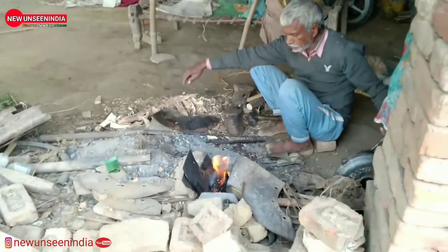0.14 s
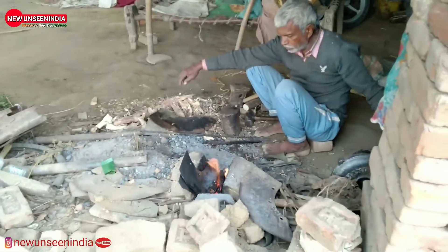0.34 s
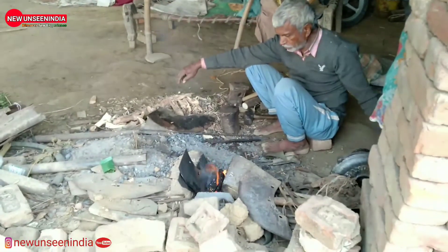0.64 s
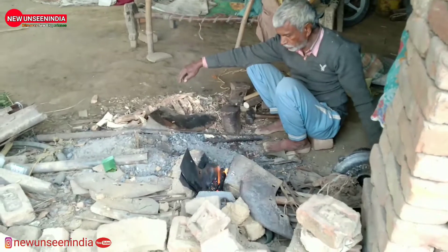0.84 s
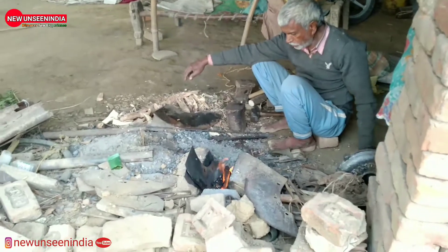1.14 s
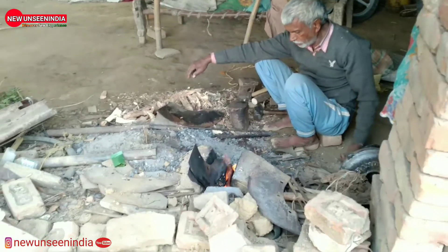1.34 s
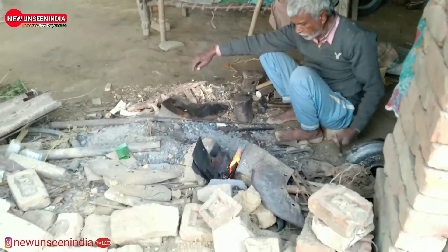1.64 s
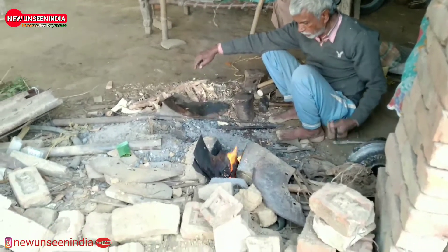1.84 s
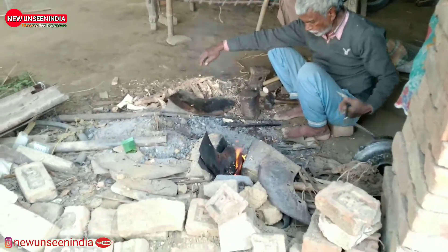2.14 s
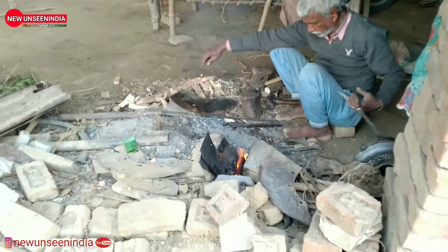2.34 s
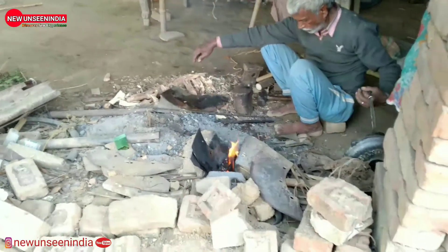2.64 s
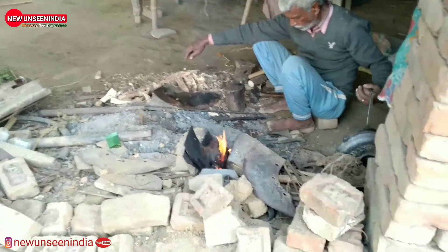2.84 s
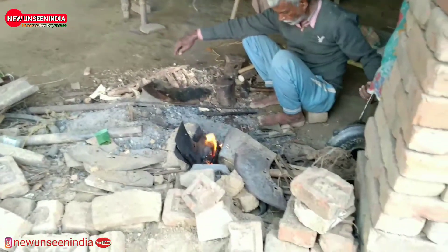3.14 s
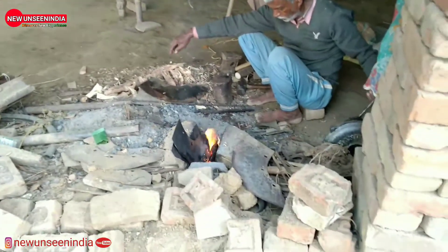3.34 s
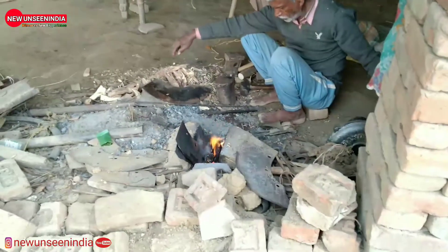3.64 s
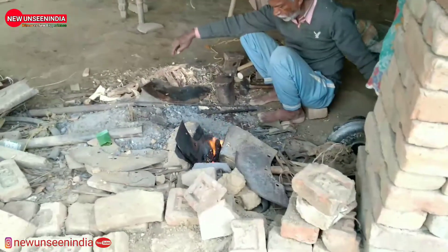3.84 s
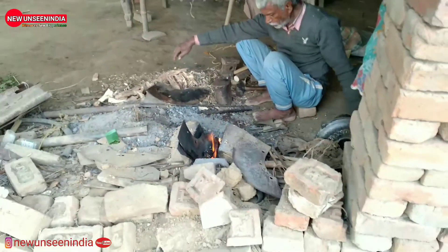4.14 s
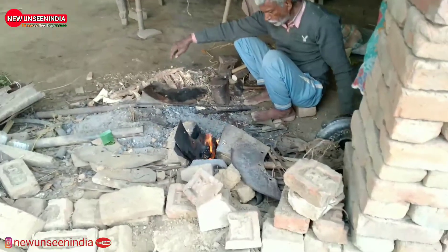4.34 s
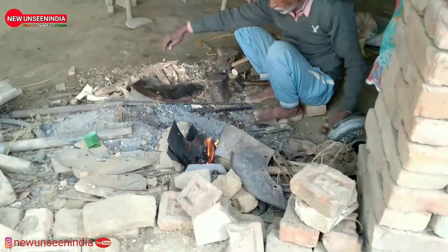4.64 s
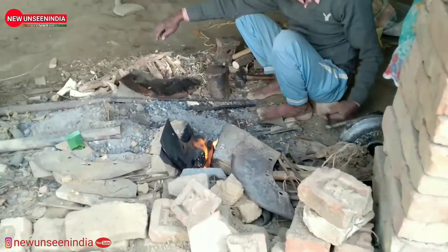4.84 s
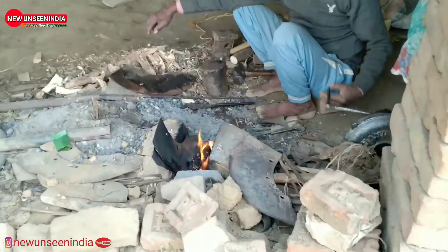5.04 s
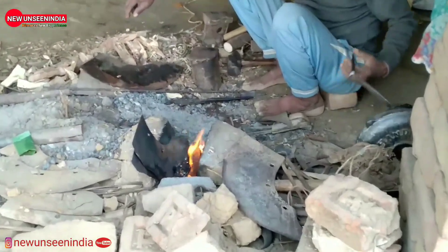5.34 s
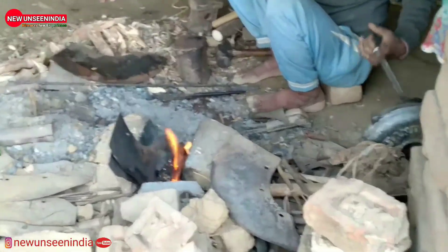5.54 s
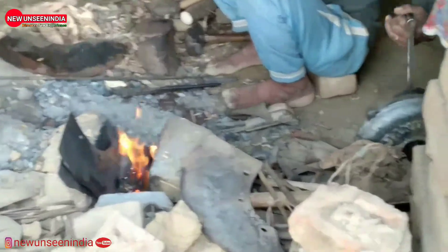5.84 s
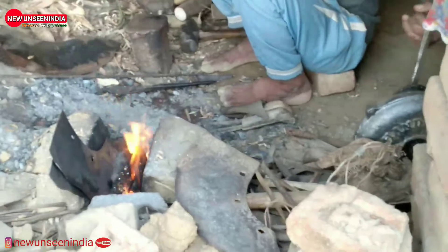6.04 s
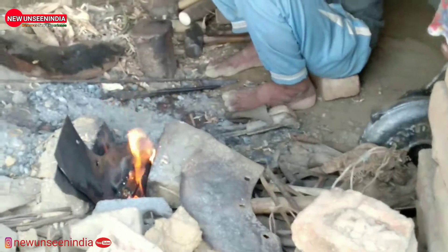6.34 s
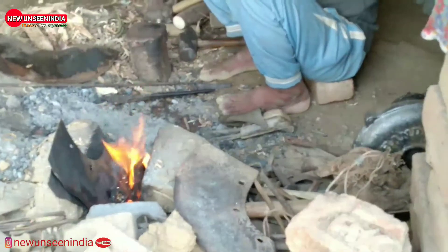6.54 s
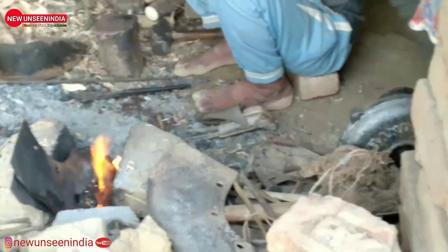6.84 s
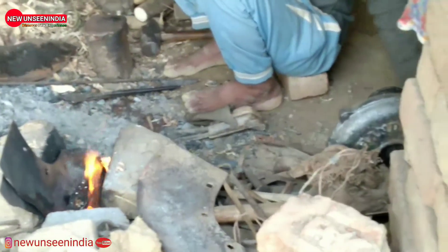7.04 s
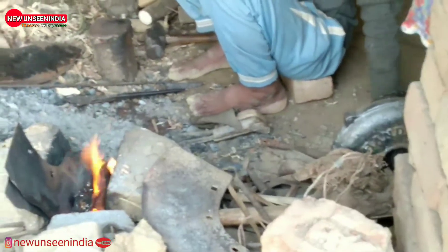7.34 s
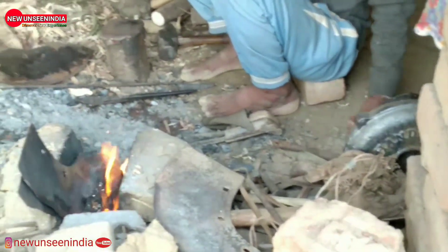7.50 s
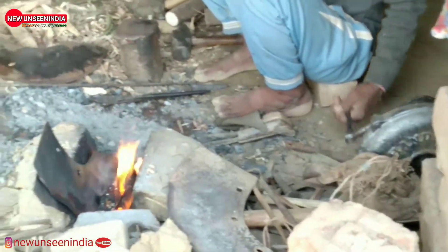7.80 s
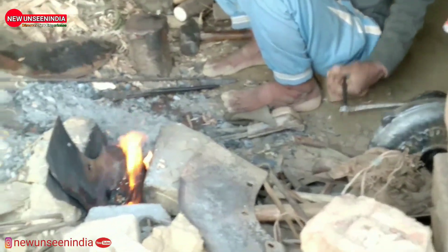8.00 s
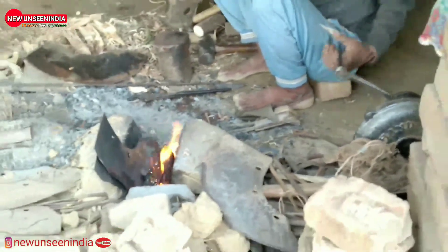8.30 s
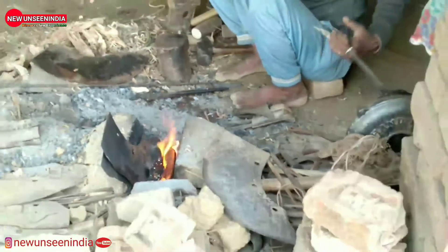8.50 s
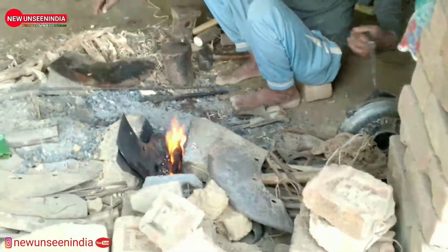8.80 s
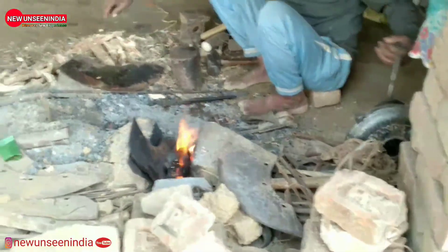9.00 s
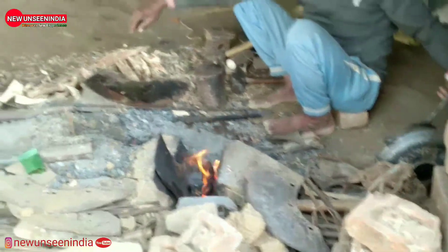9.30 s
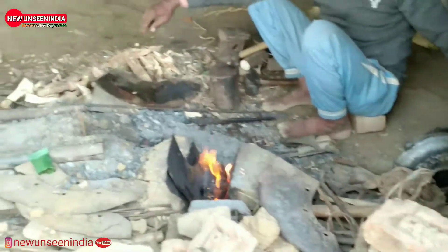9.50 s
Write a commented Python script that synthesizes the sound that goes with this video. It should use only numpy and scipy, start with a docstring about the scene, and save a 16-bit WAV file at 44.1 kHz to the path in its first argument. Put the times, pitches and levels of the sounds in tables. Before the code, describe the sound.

Dry metallic chuffing from a small hand-turned forge fan, about a dozen scrapes a second, surging and slowing over a faint low rumble.

```python
"""A hand-cranked rotary bellows blows into a small ground forge in an open yard, over a low rumble.
It quickens within 0.8 s; once a turn the fan scrapes the tin casing, catches again and puffs out air.
The turns crowd together and grow loud on each push of the crank, then slow down between pushes.
Near 2.8 s, 6 s and 8.9 s the fan is slow and its rim sings briefly; the last push builds to the end.
Shaped noise passes through resonators for the blower; flame and yard are low-frequency filtered noise."""
import sys
import numpy as np
from scipy import signal
from scipy.fft import rfft, irfft, next_fast_len
from scipy.io import wavfile
from scipy.ndimage import uniform_filter1d

SR = 44100
rng = np.random.default_rng(int(sys.argv[2]) if len(sys.argv) > 2 else 0)


def put_to_file(sound):
    """Save the sound as 16-bit audio at rate SR, in the file named by the first command-line argument."""
    columns = np.atleast_2d(sound).T  # one column per channel
    safe = np.clip(columns, -1, 1)
    whole_steps = np.round(safe * 32767)
    wavfile.write(sys.argv[1], SR, whole_steps.astype(np.int16))


N = 426006

# Tone balance of the blower's low range, softest near 660 Hz: f/Hz, level/dB
LOW_BALANCE = [(300, 2), (335, -2), (400, 1.5), (480, 0), (570, -1.5), (660, -5.5), (740, 1), (900, 2),
               (1100, 1)]
BLOWER_DB = -25.5   # rms level without the singing rim


def blower():
    """Superposition: friction, impacts and air flow add up to one sound of the blower."""
    tin = rms_one(casing(reflected(friction(patchy_db=2.5), echo_db=-4.5)))
    rub = rubbing()
    inside = scrape(tin, rub) + from_db(5.5) * sizzle(tin, rub)
    inside = inside + from_db(0.86) * rattle(tin) + from_db(-1.0) * puff(tin)
    inside = inside + flow() + knocks()
    outside = ports(filtered(inside, from_db(per_bin(LOW_BALANCE))))
    return from_db(BLOWER_DB) * rms_one(outside) + sings()


# Each LAW: level at cruising speed/dB, rise per doubling of speed/dB,
# rise per doubling a second of push/(dB s), share of the contact/1, share of the draught/1
SCRAPE_LAW = (3, 6.5, -0.65, 1.08, 0)
# Friction in one turn: part of the turn/1, level/dB, share of the second rub/1, gain on a slow turn/dB
SCRAPE_TURN = [(.04, 2.5, 0, -3.5), (.11, 5, 0.14, -3.5), (.23, 4.5, 0.06, -9.5), (.32, 3, 0.58, -12.5),
               (.43, 2.2, 0.88, -5.5), (.56, 0.9, 0.58, -14.5), (.72, -4.5, 1, -7.5), (.9, -6, 0.74, -9),
               (.985, -2, 0.74, -9)]


def rubbing():
    """Dry friction: the force of contact repeats with each turn; drags add to it in power."""
    contact = np.hypot(each_turn(SCRAPE_TURN, SCRAPE_LAW, bright=True), drags())
    return contact * gritty(grit_db=1.04, grit_rate=93)


def scrape(tin, rub):
    """Friction-excited vibration: the rub modulates two upper bands of the tin sound."""
    lower = evened(tin, 2168, 5004) * gritty(grit_db=0.24, grit_rate=27)
    upper = evened(tin, 4910, 9900)
    return rub * (lower + upper)


# Gain of the treble above about 10 kHz: t/s, level/dB
TREBLE = [(0, 2.5), (1, 1.5), (2.5, 1), (4.2, -1.5), (5.3, 0), (6.3, 1), (7.5, -1.2), (8.298, 1.5),
          (9.099, -0.5), (9.66, 2.5)]


def sizzle(tin, rub):
    """Nonlinear brightening: the treble grows faster than the force of contact."""
    harder = rms_one(rub ** 1.15) * gritty(grit_db=1.5, grit_rate=29)
    return harder * evened(tin, 9910, 20300) * from_db(over_time(*np.transpose(TREBLE)))


RATTLE_LAW = (2.6, 16.4, 0.037, 0.73, 0.16)
# Shaking of the casing in one turn: part of the turn/1, level/dB, share of the second rub/1,
# gain on a slow turn/dB
RATTLE_TURN = [(.045, 5.5, 0, 7.5), (.17, 4.5, 0.6, 4.5), (.3, 4, 0, 1.5), (.43, 5.5, 0, -1.5),
               (.55, 1, 0, -3), (.71, -4, 0, -9), (.83, -2, 0, 1), (.985, 1.5, 0.65, -4.5)]
# Hollowness, the low band of the rattle against the upper ones: t/s, level/dB
HOLLOWNESS = [(0, 0), (1.3, -6.5), (2.805, 2.5), (4.1, -0.5), (5.298, 4), (6.799, 1), (8.3, 2.5),
              (9.2, 1.5), (9.66, -2)]


def rattle(tin):
    """Independent modulation: each of three lower bands of the tin sound is shaken in its own way."""
    hollow = from_db(over_time(*np.transpose(HOLLOWNESS)) / 2)   # half up, half down
    shake = each_turn(RATTLE_TURN, RATTLE_LAW) * gritty(grit_db=1.5, grit_rate=210)
    low, middle, high = (gritty(grit_db=1.83, grit_rate=33) for _ in range(3))
    low_band = evened(tin, 590, 951) * low
    upper_bands = evened(tin, 975, 1365) * middle + evened(tin, 1382, 2133) * high
    return shake * (low_band * hollow + upper_bands / hollow)


PUFF_LAW = (2.1, 13, 2.74, 1.03, 1.08)
# Air pushed out in one turn: part of the turn/1, level/dB, share of the second rub/1,
# gain on a slow turn/dB
PUFF_TURN = [(.05, 6, 0, 10.5), (.28, 6.5, 0.26, -1.5), (.42, 7, 0.1, -1), (.65, -9, 0.1, 4),
             (.85, 5.5, 0, -6.5)]


def puff(tin):
    """Pulsating flow: each turn pushes out air, heard in the lowest band of the tin sound."""
    pulse = each_turn(PUFF_TURN, PUFF_LAW) * gritty(grit_db=3.0, grit_rate=95)
    return pulse * evened(tin, 301, 665)


FLOW_LAW = (-13, 7, -1, 1, 0.72)
# Spectral density of air streaming through the pipe and humming on its modes: f/Hz, level/dB
FLOW_SPECTRUM = [(200, -35), (340, -10), (410, -6.5), (520, -6), (690, -10.5), (790, -1.5), (850, -3),
                 (900, -0.5), (970, -9), (1130, -0.5), (1350, -6), (2200, -17)]


def flow():
    """Turbulence noise: the stream is continuous and its level follows the speed of the fan."""
    stream = filtered(rng.standard_normal((2, N)), from_db(per_bin(FLOW_SPECTRUM)))
    return from_db(driven_db(FLOW_LAW, np.arange(N) / SR)) * rms_one(stream)


# Moments when the fan catches the casing hard: t/s, level/dB
HARD_CATCHES = [(0.184, 0), (0.376, -1), (0.622, 10), (0.999, 3), (1.886, 7), (2.718, 6.5), (3.018, 1.5),
                (3.171, 0.5), (3.407, 3.5), (3.592, 4), (3.75, 12.5), (3.825, 10), (3.9, 12.5), (4.432, 10),
                (4.517, 12), (4.978, 13.5), (6.162, 3), (6.546, 12.5), (6.706, 4), (6.784, 11), (6.859, 11),
                (6.94, 10.5), (7.967, 6), (8.36, 11), (8.833, 7), (9.378, 7.5), (9.466, 9), (9.551, 8)]
KNOCK_ATTACK_S, KNOCK_DECAY_S = 0.0019, 0.01
# Spectral density of a knock before it enters the casing: f/Hz, level/dB
KNOCK_SPECTRUM = [(150, -25), (400, -6), (1000, 8.5), (2000, 9), (5000, 7), (14000, 8)]


def knocks():
    """Impact excitation: short noise bursts, as shared and diffuse sound, leave the casing ringing."""
    t, burst = np.arange(N) / SR, ticks()
    for s, db in HARD_CATCHES:
        age = t[:4000]
        pulse = np.exp(-age / KNOCK_DECAY_S) * np.minimum(age / KNOCK_ATTACK_S, 1)
        burst[int(s * SR):][:len(age)] += from_db(db) * pulse
    noise = burst * rng.standard_normal((2, N))
    return casing(filtered(noise, from_db(per_bin(KNOCK_SPECTRUM))))


# TICK_DB is the faintest tick; the excess above it is exponential, at most three spreads
TICKS_PER_S, TICK_DB, TICK_SPREAD_DB, TICK_DECAY_S = 21, -14, 5, 0.0014


def ticks():
    """Poisson process: loose parts tick at random all the time and each tick decays; gain per sample."""
    sizes = from_db(TICK_DB + TICK_SPREAD_DB * np.minimum(rng.exponential(1, N), 3))
    born = rng.random(N) < TICKS_PER_S / SR
    decay = np.exp(-1 / (TICK_DECAY_S * SR))
    return signal.lfilter([1], [1, -decay], sizes * born + 1e-18)


# Moments when the fan drags on the casing in mid-turn: t/s, length/s, level/dB
MID_TURN_DRAGS = [(1.245, 0.03, -7), (1.41, 0.025, 6), (2.152, 0.02, 2), (3.083, 0.03, -11),
                  (3.347, 0.028, -23), (4.463, 0.02, 4), (5.608, 0.03, 5), (5.666, 0.02, 3),
                  (5.7, 0.047, 3), (5.79, 0.025, -1), (5.822, 0.024, 3), (6.112, 0.025, -8),
                  (6.63, 0.015, 8), (7.13, 0.028, 3), (7.212, 0.043, 4.5), (8.769, 0.044, 5),
                  (9.11, 0.02, -4), (9.22, 0.015, -6)]


def drags():
    """Intermittent contact: a wobble of the axle makes the rub swell and fade; gain per sample."""
    t = np.arange(N) / SR
    return sum(from_db(db) * np.exp(-(2 * (t - s) / length) ** 2) for s, length, db in MID_TURN_DRAGS)


# Brief tones of the fan's rim on slow turns: t/s, length/s, f/Hz, level/dB
RIM_TONES = [(2.784, 0.05, 3990, -37), (2.937, 0.045, 3980, -43), (5.987, 0.074, 3840, -50),
             (8.882, 0.052, 4000, -40), (9.005, 0.052, 3960, -57)]


def sings():
    """Friction-excited resonance: a light touch makes one narrow mode of the rim swell and fade."""
    t, out = np.arange(N) / SR, np.zeros(N)
    waver = np.cumsum(drift(146)) * 30 / SR   # phase in cycles; the pitch strays by 30 Hz rms
    for s, length, hz, db in RIM_TONES:
        swell = np.exp(-(2 * (t - s) / length) ** 2)
        out += np.sqrt(2) * from_db(db) * swell * np.sin(2 * np.pi * (hz * t + waver))
    return out * gritty(grit_db=2.0, grit_rate=51)


def friction(patchy_db, count=20):
    """Random surface roughness: two flat noises change colour as the point of contact wanders."""
    white = rng.standard_normal((2, 2, N))   # neighbouring bands get unrelated noise
    edges = np.linspace(np.sqrt(200), np.sqrt(17500), count + 1) ** 2
    total = 0
    for k, (low, high) in enumerate(zip(edges, edges[1:])):
        total = total + band(white[k % 2], low, high) * rms_one(from_db(patchy_db * drift(18.0)))
    return total


# Reflection of the small tin walls, strongest near 2.2 kHz: f/Hz, level/dB
WALL_REFLECTION = [(900, -4), (2200, 0.5), (10000, -3.5)]


def reflected(x, echo_db, count=3):
    """Comb filtering: every turn touches another spot, so its echoes have their own short delays."""
    turn = np.searchsorted(turn_starts() * SR, np.arange(N))
    lags = (rng.uniform(.0006, .007, (turn[-1] + 1, count)) * SR).astype(int)
    signs = rng.choice([-1, 1], lags.shape)
    echoes = sum(signs[turn, k] * x[:, np.arange(N) - lags[turn, k]] for k in range(count))
    return x + from_db(echo_db) * filtered(echoes, from_db(per_bin(WALL_REFLECTION)))


# Peaks and dips of the blower's tone colour: f/Hz, bandwidth/Hz, lift/dB
PEAKS_AND_DIPS = [(389, 36, 8.7), (438, 67, 9.1), (773, 33, 12.5), (900, 42, 17.9), (1062, 60, 9.2),
                  (1183, 62, 12.4), (1462, 68, 9.2), (1770, 70, 6.5), (1925, 67, 2.8), (2465, 38, 5.8),
                  (2650, 38, 6), (2795, 55, 5.8), (2989, 49, 4.4), (3202, 46, 5), (3385, 45, 3),
                  (3538, 35, 4.2), (3723, 50, 5.6), (3845, 85, 5.8), (3998, 136, 11.2), (4112, 40, 8),
                  (4249, 84, 8.8), (4425, 62, 8.7), (4590, 150, -5.5), (4753, 65, 6.2), (5290, 89, 5.1),
                  (5580, 50, 3.5), (5865, 110, 7.5), (6340, 60, 3), (6690, 55, 3.6), (7437, 179, 2.2),
                  (7909, 116, 1.7), (8900, 200, 2.2), (9705, 89, 3.0), (11100, 200, 2), (14381, 89, 4.8)]
# Broad spectral envelope of the blower: f/Hz, level/dB
BLOWER_ENVELOPE = [(300, -16.1), (600, -15.0), (700, -17.6), (1100, -12.3), (1350, -12.8), (2200, -11.2),
                   (2550, -10.9), (3000, -8.3), (3600, -10.9), (4500, -12.8), (5000, -10.2), (5400, -6.3),
                   (6200, -5.2), (6800, -1.9), (8000, 0.0), (9000, -4.5), (10200, -9.9), (12000, -4.1),
                   (14300, -11.9), (15300, -9.9)]


def casing(x):
    """Resonance: two-pole filters in series give all sounds of the casing the same peaks and dips."""
    for hz, width, lift_db in PEAKS_AND_DIPS:
        r = np.exp(-np.pi * width / SR)
        poles = [1, -2 * r * np.cos(2 * np.pi * hz / SR), r * r]
        peak = signal.lfilter([1, 0, -1], poles, x) * (1 - r * r) / 2
        x = x + (from_db(lift_db) - 1) * peak
    return filtered(x, from_db(per_bin(BLOWER_ENVELOPE)))


# Left minus right level: f/Hz, level/dB
LEFT_OVER_RIGHT = [(250, 3.5), (420, 1.5), (650, 0), (850, 4.5), (1150, 8), (1450, 0), (1900, -1),
                   (2300, -2), (3900, 0), (4800, -2.5), (6200, -11.5), (8000, -9), (9500, -8), (11200, -1),
                   (14000, -2.5)]
# Coherence of left and right: f/Hz, correlation/1
COHERENCE = [(200, 1), (450, 0.98), (690, 0.85), (790, 0.96), (1100, 0.75), (1200, 0.85), (1340, 0.5),
             (1470, 0.68), (1600, 0.35), (1770, 0.68), (2100, 0.1), (3250, 0.15), (3470, 0.7), (3750, 0.25),
             (4300, 0.5), (4600, 0.62), (4900, 0.08), (6900, 0.08), (8000, 0.3), (9500, 0.05)]
# Phase by which the left leads: f/Hz, phase/rad
LEFT_LEAD = [(300, 0), (880, 0.15), (1300, -1.6), (1800, -0.2), (2300, -4.1), (2800, -4), (3050, -5.2),
             (3600, -6.4), (4000, -8.2), (4400, -9.4), (4650, -9.5), (5050, -12.5), (7300, -19.8),
             (9000, -25)]


def ports(pair):
    """Interaural coherence: shared and diffuse sound reach left and right with own level and phase."""
    alike, sign = per_bin(COHERENCE), np.array([[1], [-1]])
    shared = filtered(pair[0], np.sqrt(1 + alike))
    diffuse = filtered(pair[1], np.sqrt(1 - alike))
    shade = from_db(sign * per_bin(LEFT_OVER_RIGHT) / 2)
    shade = shade / np.linalg.norm(shade, axis=0)   # constant total power
    return filtered(shared + sign * diffuse, shade * np.exp(.5j * sign * per_bin(LEFT_LEAD)))


# No two turns are quite alike: random spread of the turn, mean and spread of the second rub
TURN_SPREAD_DB, SECOND_RUB_DB, SECOND_SPREAD_DB = 0.76, 1.5, 1.03
SECOND_DB_PER_DOUBLING = 4   # a slow fan hardly catches a second time
# Uneven turns: t/s, then level of the scrape, of the rattle and puff, and of the second rub/dB
UNEVEN_TURNS = [(0.07, 4.5, 0, -6), (0.378, 2, 1, -2), (0.543, 1, 1.5, -3), (0.62, -0.5, 1.5, 1.5),
                (1.178, -5, -3, 5), (1.27, 1, -1, 3.5), (1.455, 0.5, 3, -3), (1.548, 3, 2, 0.5),
                (1.884, 2.5, 0, 3.5), (2.12, -0.5, -1.5, -3.5), (2.2, 0, -2, 3), (2.37, 3, -1.5, -6.5),
                (2.47, 1.5, -7, 5), (2.582, 3.5, -0.5, 9.5), (2.715, 7.5, 4, -6), (3.015, -0.5, 2.5, 5),
                (3.41, 0.5, -1.5, 1), (3.67, -2, 0, -0.5), (3.82, -1.5, 0, 1.5), (4.04, 2, 2.5, -3),
                (4.27, 2, 1, -3.5), (4.431, -5.5, 1, 6.5), (4.514, -4, 0.5, 3), (4.59, 2.5, 1.5, -6.5),
                (4.98, -0.5, 1.5, -2), (5.05, -4.5, 2, 7), (5.451, 4, -1.5, -7), (5.54, -0.5, -4, -4),
                (5.63, -8.5, -11.5, -1), (5.73, -17, -12, 1), (5.82, -7, -23, -10.5), (6.04, 4, 2, 5),
                (6.16, 2.5, -0.5, 1.5), (6.27, 3.5, 1.5, 0), (7.09, 1.5, -1, 0.5), (7.349, -5, -3.5, 4),
                (7.53, -3, 0, 2.5), (7.617, 1.5, 0, -1.5), (7.88, -0.5, -2, -3.5), (8.04, 0.5, 3, -0.5),
                (8.12, -2, 1, 5.5), (8.28, -2.5, -3, 3), (8.52, -0.5, -0.5, -3.5), (8.62, 0.5, -2, 1.5),
                (8.72, 2.5, -4.5, 0), (8.83, 6, -1, -11), (8.95, -2, -5, 1.5), (9.06, 3, 0, -0.5),
                (9.18, 2.5, 1.5, -5), (9.28, -5, 0.5, 3), (9.38, -0.5, -1.5, -3)]


def each_turn(shape, law, bright=False):
    """Periodic modulation: one shape is stretched over every turn of the fan; gain per sample."""
    start = turn_starts()
    length = np.diff(start, append=2 * start[-1] - start[-2])
    chance = rng.standard_normal((len(start), 2))
    level_db = driven_db(law, start + length / 2) + TURN_SPREAD_DB * chance[:, 0]
    second_db = SECOND_RUB_DB - SECOND_DB_PER_DOUBLING * np.log2(length * CRUISE_TURNS_PER_S)
    second_db = second_db + SECOND_SPREAD_DB * chance[:, 1]
    for s, scrape_db, rattle_db, late_db in UNEVEN_TURNS:
        turn = np.argmin(abs(start - s))
        level_db[turn] += scrape_db if bright else rattle_db
        second_db[turn] += late_db
    slow = np.clip((length - .085) / 0.04, 0, 1)   # 1 on turns of 0.125 s or longer
    part, shape_db, share, slow_db = np.transpose(shape)
    s = start[:, None] + length[:, None] * part
    db = level_db[:, None] + shape_db + second_db[:, None] * share + slow[:, None] * slow_db
    idle_db = -15.0   # the fan coasts before its first scrape
    return from_db(over_time(np.r_[start[0] - .012, np.sort(s.ravel())], np.r_[idle_db, db.ravel()]))


# Speed of the fan, rising with each push of the crank: t/s, turns per second/(1/s)
FAN_SPEED = [(0.04, 7.38), (0.21, 9.89), (0.77, 14.63), (0.85, 12.38), (1.15, 11.06), (1.56, 10.22),
             (1.84, 13.69), (2.33, 11.26), (2.69, 7.03), (3.05, 6.16), (3.34, 8.81), (3.64, 12.83),
             (4.01, 13.69), (4.58, 11.97), (5.0, 14.01), (5.6, 10.3), (5.83, 12.18), (5.94, 7.33),
             (6.17, 8.51), (6.44, 11.66), (6.86, 13.25), (7.34, 11.41), (7.71, 10.56), (8.0, 13.04),
             (8.44, 12.17), (8.85, 8.37), (9.13, 8.69), (9.65, 13.62)]


def turn_starts():
    """Phase integration: contact comes once a turn, first after half a turn, or at a hard catch; s."""
    angle = np.cumsum(over_time(*np.transpose(FAN_SPEED))) / SR
    start = np.searchsorted(angle, np.arange(.5, angle[-1])) / SR
    for s, _ in HARD_CATCHES:
        start = np.where(abs(start - s) < .012, s, start)
    return start


CRUISE_TURNS_PER_S = 12
FULL_BLAST_TURNS_PER_S = 12.3   # above this, speed itself adds no more level
PUSH_WINDOW_S = 0.37   # the push on the crank is the gain in speed over this time
# How hard the fan bears on the casing as its axle shifts: t/s, level/dB
CONTACT_FORCE = [(0, -2), (0.5, 2), (0.75, 2), (1.1, 1.5), (1.8, -1), (2.25, 1.5), (2.9, 0.5), (3.3, -1.5),
                 (3.6, 2.1), (4.0, 3.5), (4.7, 0), (5.1, 2.5), (5.8, 1.7), (6.1, -5.5), (6.6, 1.5),
                 (7.2, 2.5), (7.9, 1), (8.3, 1.5), (9.66, 1.2)]
# How freely the draught passes through the pipe and the coals: t/s, level/dB
DRAUGHT_FLOW = [(0, -2.5), (0.45, 1), (1.25, -2.5), (1.7, -2), (2.05, 5), (2.499, 6.5), (2.8, -2),
                (3.6, -0.5), (4.5, -2), (5.05, 3), (6.1, 3), (6.501, 1), (6.9, -0.5), (7.15, -7.5),
                (7.899, -1), (8.501, 2.5), (8.949, 1), (9.3, -1), (9.66, -3)]


def driven_db(law, s):
    """Power law of speed: push, contact and draught add to it in dB; level at the times s."""
    cruise_db, speed_db, push_db, contact_share, draught_share = law

    def doublings(times):
        return np.log2(np.interp(times, *np.transpose(FAN_SPEED)) / CRUISE_TURNS_PER_S)

    gain = doublings(s + PUSH_WINDOW_S / 2) - doublings(s - PUSH_WINDOW_S / 2)
    speed = np.minimum(doublings(s), np.log2(FULL_BLAST_TURNS_PER_S / CRUISE_TURNS_PER_S))
    contact = np.interp(s, *np.transpose(CONTACT_FORCE))
    draught = np.interp(s, *np.transpose(DRAUGHT_FLOW))
    level_db = cruise_db + speed_db * speed + push_db * gain / PUSH_WINDOW_S
    return level_db + contact_share * contact + draught_share * draught


FLAME_LAW = (-57, 15, 0, -0.5, 0.5)
# Spectral density of the roar of the flame: f/Hz, level/dB
FLAME_SPECTRUM = [(100, -36), (170, -11), (200, 0), (235, 1), (270, 5), (320, -11), (450, -10),
                  (900, -30.5)]


def flame():
    """Combustion noise: a low roar whose level follows the fan and its draught."""
    return from_db(driven_db(FLAME_LAW, np.arange(N) / SR)) * low_noise(FLAME_SPECTRUM)


# Level of the yard's rumble: t/s, level/dB
YARD_LEVEL = [(0, -56), (2.5, -54.5), (5.802, -58), (6.5, -55), (9.66, -56)]
# Spectral density of the low rumble of the yard: f/Hz, level/dB
YARD_SPECTRUM = [(20, -22), (35, -20), (52, -11), (72, 4.5), (95, -1), (125, 0), (160, 1.5), (200, -12.5),
                 (300, -30), (600, -44)]


def yard():
    """Ambient noise: a low random rumble of slowly changing, fluttering level."""
    level = from_db(over_time(*np.transpose(YARD_LEVEL)))
    return level * low_noise(YARD_SPECTRUM) * gritty(grit_db=2.0, grit_rate=8.5)


def low_noise(spectrum):
    """Long-wave coherence: dull noise, nearly the same left and right; rms 1."""
    noise = filtered(rng.standard_normal((2, N)), from_db(per_bin(spectrum)))
    return rms_one(noise[0] + from_db(-15.0) * noise[1] * np.array([[1], [-1]]))


def evened(x, low_hz, high_hz):
    """Envelope flattening: one band is held at its mean power, so that other gains shape it."""
    edges = [(low_hz / 1.05, 0), (low_hz * 1.05, 1), (high_hz / 1.05, 1), (high_hz * 1.05, 0)]
    part = filtered(x, per_bin(edges))
    power = uniform_filter1d(part ** 2, size=1500, axis=-1)   # 34 ms running mean
    return part * np.sqrt(power.mean() / (np.abs(power) + 1e-20))


def gritty(grit_db, grit_rate):
    """Random amplitude modulation: an uneven flutter of the level, as from tiny catches; rms 1."""
    return rms_one(from_db(grit_db * drift(grit_rate)))


def drift(rate):
    """Low-passed noise: two equal poles at `rate` Hz give a smooth random course; rms 1."""
    r = np.exp(-16 * np.pi * rate / SR)   # computed at one eighth of the sample rate
    noise = rng.standard_normal(N // 8 + 4002)
    slow = signal.lfilter([1], [1, -2 * r, r * r], noise)[4000:]   # skips the filter's onset
    return np.interp(np.arange(N) / 8, np.arange(len(slow)), rms_one(slow))


def band(x, low_hz, high_hz):
    """Power-complementary filtering: neighbouring bands add up to a flat power spectrum."""
    return signal.sosfilt(signal.butter(3, [low_hz, high_hz], "band", fs=SR, output="sos"), x)


def filtered(x, gain):
    """Convolution theorem: a filter is one gain per FFT bin."""
    size = next_fast_len(N, True)
    return irfft(rfft(x, size) * gain, size)[..., :N]


def per_bin(points):
    """Logarithmic frequency scale: reads a (f/Hz, value) table at every FFT bin."""
    hz, values = np.transpose(points)
    bins_hz = np.fft.rfftfreq(next_fast_len(N, True), 1 / SR)
    return np.interp(np.log(bins_hz + 1), np.log(hz), values)


def over_time(s, values):
    """Linear interpolation: joins points by straight lines, one value per sample."""
    return np.interp(np.arange(N) / SR, s, values)


def from_db(db):
    """Level definition: 20 dB is a factor of ten in amplitude."""
    return 10 ** (np.asarray(db) / 20)


def rms_one(x):
    """Normalisation to unit mean power."""
    return x / np.sqrt(np.mean(x ** 2) + 1e-20)


def scene():
    """Superposition of the blower, the flame that roars with its draught and the rumble of the yard."""
    return blower() + flame() + yard()


def record(dry):
    """Low-pass filtering: an elliptic filter cuts the top steeply at 15.6 kHz."""
    return signal.sosfilt(signal.ellip(12, .1, 90, 15600, fs=SR, output="sos"), dry)


dry = scene()
out = record(dry)
put_to_file(out)
```